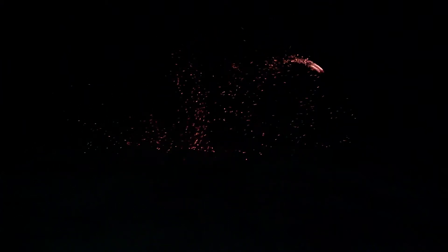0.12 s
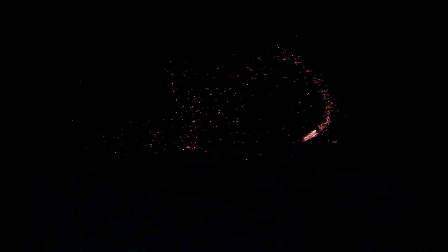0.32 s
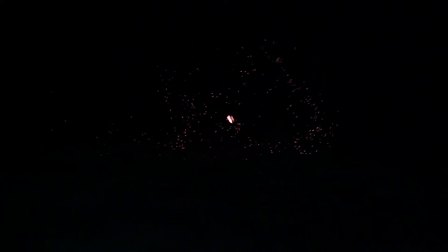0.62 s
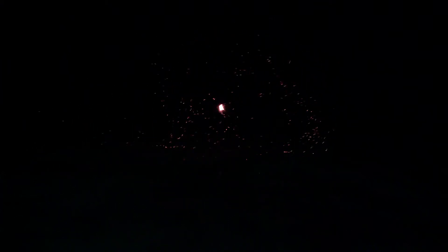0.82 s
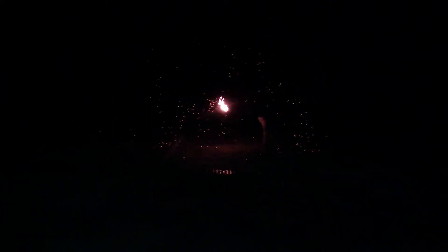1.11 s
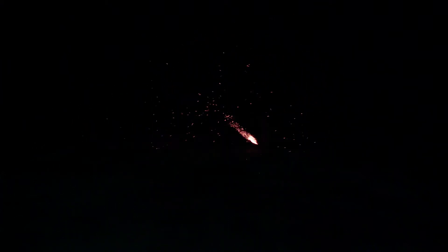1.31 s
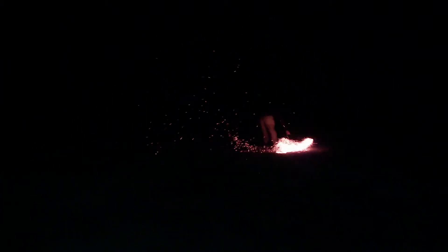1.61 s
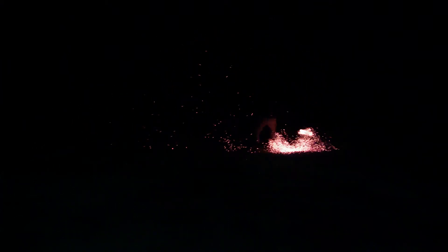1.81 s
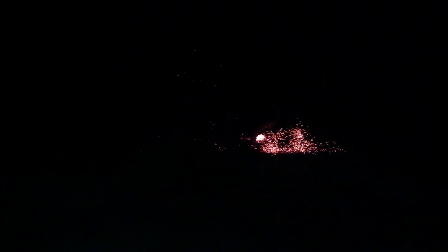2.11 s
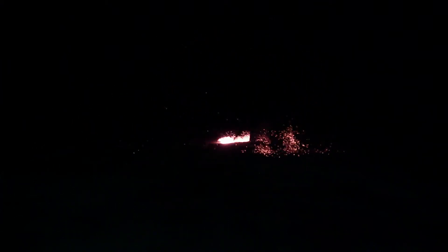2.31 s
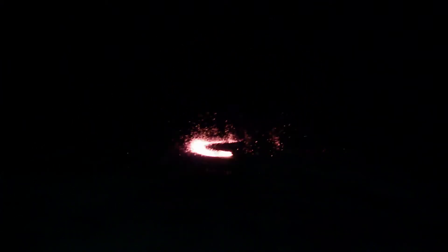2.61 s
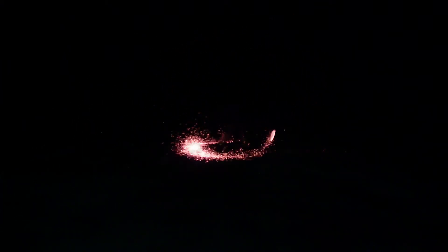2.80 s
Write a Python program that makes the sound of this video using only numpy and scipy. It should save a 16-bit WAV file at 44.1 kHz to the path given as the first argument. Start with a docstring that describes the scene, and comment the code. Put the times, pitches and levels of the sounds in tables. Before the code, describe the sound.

Chain links jingle and chink close by while a swung ember cage knocks and scrapes.

```python
"""Chain links rattle in bursts, close to a single microphone, outdoors at night.
A caged ball of embers is whirled on the chain, then dragged low over the ground. Link strikes link,
a clasp rings clean, and the cage knocks and scrapes through its own resonances.
Embers tick and snap; behind them lie the rush round the ball and a faint night floor."""
import sys
import numpy as np
from scipy import signal
from scipy.fft import rfft, irfft
from scipy.io import wavfile
from scipy.ndimage import uniform_filter1d

SR = 44100
rng = np.random.default_rng(int(sys.argv[2]) if len(sys.argv) > 2 else 0)


def to_wav(sig):
    """Store sig (one row per channel, or 1-D mono) as 16-bit WAV at the path in sys.argv[1].

    Samples outside -1..1 are clipped; the rate is SR.
    """
    pcm = np.clip(np.atleast_2d(sig), -1, 1) * 32767
    pcm = np.round(pcm).astype(np.int16)
    wavfile.write(sys.argv[1], SR, pcm.T)  # frames by channels


N = 130095

# spectrum of the night air: f/Hz, density/dB
NIGHT_SPECTRUM = [(40, -22), (155, -16), (260, -24), (500, -4.5), (800, -1.5), (950, 5.5), (1120, -5.5),
                  (2100, -3), (3600, -8.5), (5500, -7.5), (7000, -13), (9000, -19), (16500, -22)]
# bass, low, middle and treble bands, cross-faded in the gaps: from f/Hz, to f/Hz
AIR_BANDS = [(0, 250), (420, 2200), (2800, 4800), (7500, 20000)]
# course of the rush: t/s, low level/dB, middle level/dB, treble level/dB
RUSH_LEVELS = [(.0, -58, -59, -51), (0.191, -60.5, -67, -53.5), (.5, -56, -58, -50.5),
               (.68, -59, -65.5, -51.5), (.95, -57, -64, -46.5), (1.18, -61, -64, -57),
               (1.5, -55, -58, -49), (1.7, -59, -54, -45.5), (2.07, -64, -65, -56.5),
               (2.35, -52.5, -46.5, -45.5), (2.7, -55.5, -53.5, -52), (2.95, -56.5, -53.5, -65)]
# ticks grow as scattered embers burn out on the ground: from t/s, to t/s
SHOWER_SPAN = (2.5, 2.8)
# the loudest snaps of embers: t/s, level/dB
EMBER_SNAPS = [(1.904, -41), (2.082, -40.5), (2.575, -27), (2.7033, -39), (2.817, -36.5), (2.871, -46),
               (2.916, -44.5)]
# dull knocks: t/s, level/dB, centre f/Hz, t60/s
DULL_KNOCKS = [(0.472, -49.5, 966, 0.17), (0.802, -37.5, 843, 0.072), (0.817, -41.5, 575, 0.1),
               (1.215, -47.5, 1880, 0.069), (1.477, -36, 870, 0.062)]
# resonances of the cage: f/Hz, width/Hz, level/dB
CAGE_MODES = [(1350, 12, -1.5), (1500, 85, 4.5), (2315, 64, -9), (3080, 530, -3.5), (3760, 170, -6),
              (4300, 56, -4.5), (4660, 40, -3)]
# knocks and scrapes of the cage: t/s, level/dB, treble above it/dB, bass above it/dB, t60/s
CAGE_KNOCKS = [(1.5584, -16.5, -13, -23.5, 0.027), (2.1254, -37.5, -16, -7, 0.066),
               (2.273, -40, 3, -4, 0.2), (2.3094, -31, -2, -38, 0.062), (2.347, -28.5, -6, -15, 0.057),
               (2.392, -26.5, -6, -41, 0.049), (2.4043, -36, 8, -27, 0.065), (2.418, -34.5, -6, -19, 0.066),
               (2.444, -29.5, 9.5, -35, 0.062), (2.4774, -22.5, 6, -21, 0.063),
               (2.5846, -36.5, -1, -19, 0.047), (2.6006, -21.5, -10, -22, 0.074),
               (2.633, -35, -8, -32, 0.036), (2.653, -27.5, -4.5, -61, 0.063),
               (2.8033, -34, -23, -16, 0.054)]
# modes of the clasp, the upper one last: f/Hz, level/dB, t60/s
CLASP_MODES = [(8513, 0, .11), (8990, -8, .06), (9900, 0, .07)]
# blows on the clasp: t/s, level/dB, upper mode above it/dB
CLASP_BLOWS = [(1.2284, -36, -10), (1.4014, -20.5, -3.5), (1.747, -31, 5.5), (1.941, -37, 2),
               (2.132, -34.5, 5.5), (2.265, -22.5, -12), (2.322, -32.5, 4), (2.5024, -29.5, -16),
               (2.5475, -37.5, 6.5)]
# modes of two links struck hard: f/Hz, level/dB, t60/s
CHINK_MODES = [(6500, 0, .007), (7000, -3, .012), (12900, -3, .003)]
# single hard chinks: t/s, level/dB
CHINK_BLOWS = [(0.8806, -24.5), (1.0368, -29), (1.268, -3)]
# modes of the rattling links, lowest first: f/Hz, level/dB, t60/s
LINK_MODES = [(5085, -20, .03), (5270, -20, .03), (6560, -17, .015), (6760, -7, .03), (6855, -2, .035),
              (6990, -2, .035), (7165, 0, .04), (7635, -15, .045), (8525, -17, .05), (8995, -15, .04),
              (9920, -19, .04), (12100, -13, .008)]
# ring of the two lowest link modes as the chain's tension changes: t/s, gain/dB
TENSION_GAIN = [(.2, 7.5), (.7, 7), (.8, 0), (1.3, 2), (1.39, 13), (1.48, -4), (1.65, 12), (1.82, 17.5),
                (1.95, 7.5), (2.0, 17), (2.2, 2), (2.5, -2)]
# spectrum of the chain's sizzle: f/Hz, density/dB
SIZZLE_SPECTRUM = [(1200, -23), (3700, -27), (5200, -12), (6000, -20), (8000, -4), (12200, 0), (14000, -6),
                   (16000, -7)]
# bursts of rattling links: t/s, relative level/dB, sizzle offset/dB, length/s
RATTLE_BURSTS = [(.0, -40, -1.5, 0.0047), (0.064, -35.5, -15.5, .02), (0.097, -45, 0, 0.018),
                 (0.1304, -28.5, -13, 0.007), (0.217, -23.5, -16.5, 0.033), (0.3088, -29, -13.5, 0.0043),
                 (0.3895, -24.5, -9, 0.03), (0.4737, -27.5, -13, 0.0071), (0.541, -28, -9, .035),
                 (0.622, -20.5, -21, 0.0051), (0.653, -39, -8.5, 0.0058), (0.702, -30.5, -20, 0.018),
                 (0.734, -37, 5.5, 0.0077), (0.748, -15, -22, 0.0041), (0.767, -27.5, -13, 0.0096),
                 (0.797, -18.5, -14, 0.018), (0.8766, -20.5, -14, 0.023), (0.906, -40.5, -4.5, 0.069),
                 (0.986, -26, -18, 0.0045), (1.037, -18.5, -13, 0.04), (1.1058, -18, -15.5, 0.0028),
                 (1.117, -25, -7, 0.0078), (1.206, -20, -11.5, 0.047), (1.263, -16.5, -8, 0.0034),
                 (1.2892, -24, -31, 0.0021), (1.306, -24.5, -4.5, 0.0057), (1.326, -30, -25, 0.014),
                 (1.3827, -30, -4, 0.067), (1.4014, -24, -8, 0.027), (1.472, -18, -16.5, 0.0027),
                 (1.531, -40, -27, 0.0068), (1.548, -28, -7, 0.026), (1.583, -26, -6, 0.014),
                 (1.614, -37, 0.5, 0.013), (1.638, -29, -11, 0.02), (1.738, -32, -1, 0.029),
                 (1.7878, -24, -12.5, 0.0016), (1.805, -31.5, -6, 0.018), (1.931, -39, -17, 0.0045),
                 (1.936, -29.5, -16, 0.01), (1.955, -27, -11.5, 0.011), (2.000, -38, -21, 0.0088),
                 (2.033, -37.5, -9, 0.0059), (2.126, -30.5, -8.5, 0.046), (2.181, -33, -6.5, 0.014),
                 (2.21, -24, -14, 0.021), (2.264, -28.5, -7, 0.012), (2.306, -29.5, -5.5, 0.058),
                 (2.386, -33, -13, 0.037), (2.489, -28, -7.5, 0.048), (2.546, -29, -12, 0.013)]


def amp(db):
    return 10 ** (np.asarray(db) / 20)


def unit_rms(x):
    return x / np.sqrt(np.mean(x ** 2) + 1e-20)


def power_sum(envelopes):
    return np.sqrt(sum(e ** 2 for e in envelopes))


def coloured(x, spectrum):
    """Filters x by points of f/Hz, level/dB; white noise keeps its rms."""
    hz, db = np.transpose(spectrum)
    gain = amp(np.interp(np.log(np.fft.rfftfreq(N, 1 / SR) + 1), np.log(hz + 1), db))
    return irfft(rfft(x) * unit_rms(gain), N)


def band(x, lo_hz, hi_hz):
    """Band-passed x at rms 1."""
    return unit_rms(signal.sosfilt(signal.butter(2, [lo_hz, hi_hz], "band", fs=SR, output="sos"), x))


def resonate(x, hz, width_hz):
    """One resonance of gain 1."""
    r = np.exp(-np.pi * width_hz / SR)
    gain = (1 - r * r) / 2
    return signal.lfilter([gain, 0, -gain], [1, -2 * r * np.cos(2 * np.pi * hz / SR), r * r], x)


def envelope(start_s, db, rise_s, hold_s, t60_s):
    """Quick rise, hold and exponential fall, placed in the scene."""
    t = np.arange(N) / SR - start_s
    on = slice(int(start_s * SR), int((start_s + hold_s + 1.5 * t60_s) * SR))
    out = np.zeros(N)
    out[on] = np.clip(t[on] / rise_s, 0, 1) * amp(db - 60 * np.maximum(t[on] - hold_s, 0) / t60_s)
    return out


def clicks(per_s, spread_db):
    """Random clicks of random sign; a few are large."""
    when, size, sign = rng.random((N, 3)).T
    return unit_rms((when < per_s / SR) * amp(-spread_db * np.log(.02 + size)) * np.sign(sign - .5))


def patchy_noise(spread_db):
    """Noise whose level varies in patches a few hundred hertz wide and some ten milliseconds long."""
    spectra = signal.stft(rng.standard_normal(N), nperseg=256)[2]
    patches = uniform_filter1d(rng.standard_normal(spectra.T.shape).T, size=3, axis=0)
    patches = unit_rms(uniform_filter1d(patches, size=5, axis=1))
    return signal.istft(spectra * unit_rms(amp(spread_db * patches)), nperseg=256)[1][:N]


def mode(hz, db, t60_s, rise_s=.0014):
    """One decaying partial with a soft start."""
    t = np.arange(int(.3 * SR)) / SR
    onset = np.sin(np.minimum(t / rise_s, 1) * np.pi / 2) ** 2
    return onset * amp(db - 60 * t / t60_s) * np.sin(2 * np.pi * hz * t)


def night_air(floor_db=-75.5, tick_db=-14, shower_db=8):
    """A steady bass floor and the rush round the ball, with ember ticks in the upper two bands."""
    hz, t = np.fft.rfftfreq(N, 1 / SR), np.arange(N) / SR
    ticks = clicks(per_s=200, spread_db=2.5) * amp(tick_db + np.interp(t, SHOWER_SPAN, [0, shower_db]))
    spectrum = rfft(coloured(patchy_noise(spread_db=3.47), NIGHT_SPECTRUM))
    spectrum += rfft(coloured(ticks, NIGHT_SPECTRUM)) * (hz > AIR_BANDS[2][0])
    masks = (np.interp(hz, np.ravel(AIR_BANDS), np.repeat(row, 2)) for row in np.eye(len(AIR_BANDS)))
    floor, *upper = (unit_rms(irfft(spectrum * mask, N)) for mask in masks)
    times, *levels = np.transpose(RUSH_LEVELS)
    rush = sum(amp(np.interp(t, times, db)) * part for db, part in zip(levels, upper))
    return amp(floor_db) * floor + rush


def ember_snaps():
    """Embers crack: dry, bright bursts a few milliseconds long."""
    bursts = power_sum(envelope(s, db, rise_s=.00021, hold_s=.00024, t60_s=.006) for s, db in EMBER_SNAPS)
    return bursts * band(rng.standard_normal(N), 4150, 11000)


def thumps(width_hz=260):
    """Dull knocks without treble: puffs of noise round a centre pitch."""
    noise, out = rng.standard_normal(N), np.zeros(N)
    for s, db, hz, t60 in DULL_KNOCKS:
        body = unit_rms(resonate(resonate(noise, hz, width_hz), hz, width_hz))
        out += envelope(s, db, rise_s=.005, hold_s=.004, t60_s=t60) * body
    return out


def cage(spread_db=5, hollow_db=8, plain_db=-9):
    """Knocks and scrapes drive grit through the cage's resonances, with a bright edge and a low body."""
    grit = unit_rms(rng.standard_normal(N) + .5 * clicks(per_s=1500, spread_db=2.5))
    rings = np.array([amp(db) * unit_rms(resonate(grit, hz, width)) for hz, width, db in CAGE_MODES])
    plain, treble, bass = band(grit, 2010, 5650), band(grit, 4200, 13000), band(grit, 414, 3040)
    out = np.zeros(N)
    for s, db, treble_db, bass_db, t60 in CAGE_KNOCKS:
        knock = envelope(s, db, rise_s=.07 * t60, hold_s=.043 * t60, t60_s=t60)
        # each knock reaches the modes unevenly; the low ones follow its bass
        reach = amp(spread_db * rng.standard_normal(len(CAGE_MODES)))
        reach *= [amp(bass_db + hollow_db) if hz < 2000 else 1 for hz, _, _ in CAGE_MODES]
        middle = reach @ rings / np.sqrt(2 * len(CAGE_MODES)) + amp(plain_db) * plain
        out += knock * (middle + amp(treble_db) * treble + amp(bass_db) * bass)
    return out


def clasp():
    """Single blows set the clasp ringing, longer and cleaner than the links."""
    *lower, upper = (mode(*m) for m in CLASP_MODES)
    out = np.zeros(N + SR)
    for s, db, upper_db in CLASP_BLOWS:
        ring = amp(db) * (sum(lower) + amp(upper_db) * upper)
        start = int(s * SR)
        out[start:start + len(ring)] += ring
    return out[:N]


def chinks():
    """Short hard blows of link on link that stand out of the rattle."""
    blows = np.zeros(N)
    for s, db in CHINK_BLOWS:
        blows[int(s * SR)] = amp(db)
    return signal.oaconvolve(blows, sum(mode(*m, rise_s=.00089) for m in CHINK_MODES))[:N]


def chain_sizzle(grain_db=2):
    """A grainy hiss goes with each burst of the links."""
    bursts = power_sum(envelope(s, db + offset_db, rise_s=.002, hold_s=hold, t60_s=.1)
                       for s, db, offset_db, hold in RATTLE_BURSTS)
    flicker = unit_rms(uniform_filter1d(rng.standard_normal(N), size=70))
    grain = unit_rms(amp(grain_db * flicker))
    return coloured(bursts * grain * patchy_noise(spread_db=3), SIZZLE_SPECTRUM)


def chain_rattle(gain_db=-6.5, first_blow_db=19, spread_db=4, linger_db=-13, rise_s=.00088):
    """Links strike each other and ring: each burst is one blow, a run of small hits and a noisy tail."""
    shake = power_sum(envelope(s, db, rise_s, hold, t60_s=.0019) for s, db, _, hold in RATTLE_BURSTS)
    linger = power_sum(envelope(s, db + linger_db, rise_s, hold, t60_s=.18)
                       for s, db, _, hold in RATTLE_BURSTS)
    # the opening blow reaches each mode with its own strength and sign
    reach = amp(spread_db * rng.standard_normal((len(RATTLE_BURSTS), len(LINK_MODES))))
    reach *= rng.choice([-1, 1], reach.shape)
    blows = np.zeros((len(LINK_MODES), N))
    for (s, db, _, _), shares in zip(RATTLE_BURSTS, reach):
        blows[:, int(s * SR)] = amp(db + first_blow_db) * shares
    tension = amp(np.interp(np.arange(N) / SR, *np.transpose(TENSION_GAIN)))
    modes, out = [mode(*m) for m in LINK_MODES], np.zeros(N)
    for i, ring in enumerate(modes):
        drive = blows[i] + shake * clicks(per_s=500, spread_db=3.5) + linger * rng.standard_normal(N)
        if i < 2:
            drive *= tension
        out += signal.oaconvolve(drive, ring)[:N]
    return amp(gain_db) * out / np.linalg.norm(modes)


def scene():
    """Close, dry metal and embers, cut below 380 Hz, in front of the night air; one channel."""
    foreground = chain_rattle() + chain_sizzle() + chinks() + clasp() + cage() + thumps() + ember_snaps()
    low_cut = signal.butter(4, 380, "high", fs=SR, output="sos")
    return (signal.sosfilt(low_cut, foreground) + night_air())[None]


def record(dry):
    """The microphone's signal ends steeply at 15.72 kHz."""
    low_pass = signal.firwin(801, 15720, window=("kaiser", 7), fs=SR)
    return signal.oaconvolve(dry, low_pass[None], "same")


dry = scene()
out = record(dry)
to_wav(out)
```